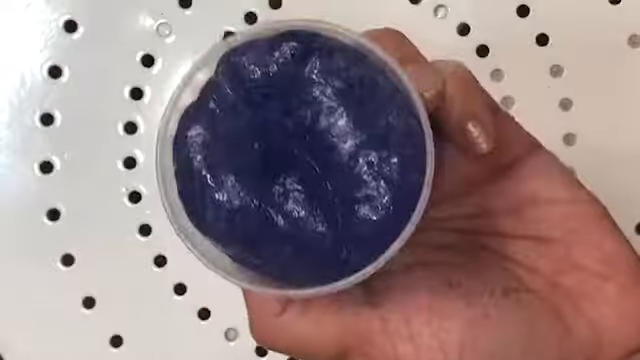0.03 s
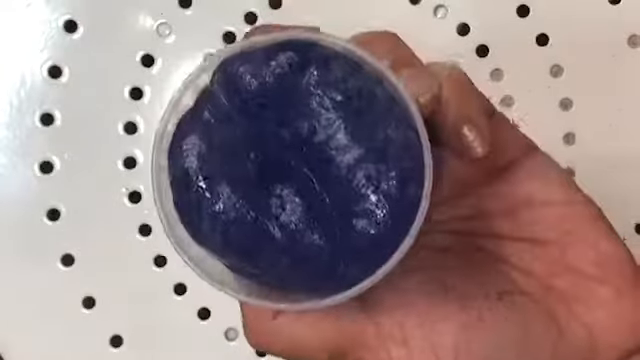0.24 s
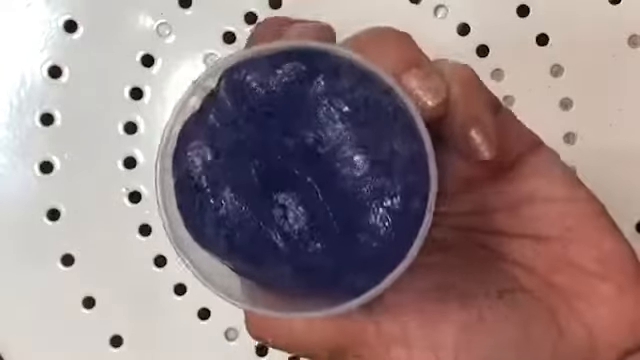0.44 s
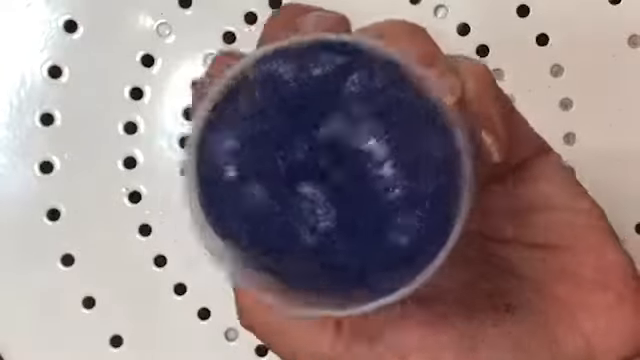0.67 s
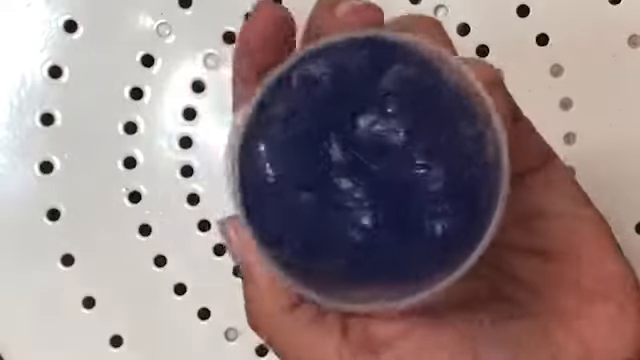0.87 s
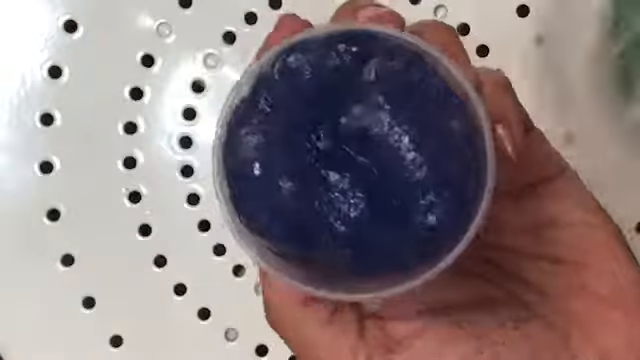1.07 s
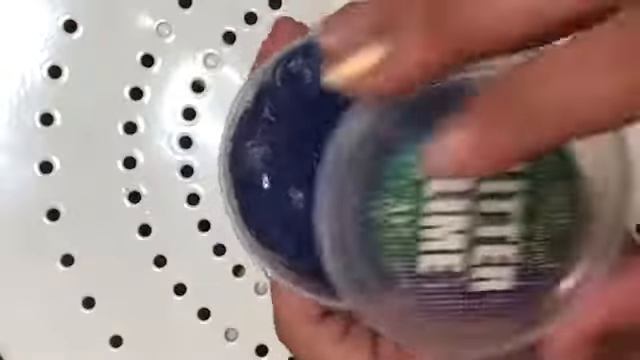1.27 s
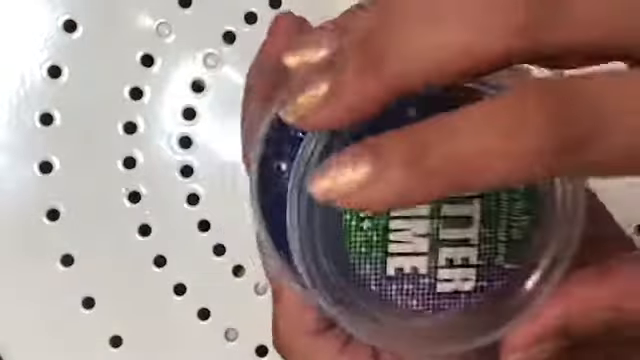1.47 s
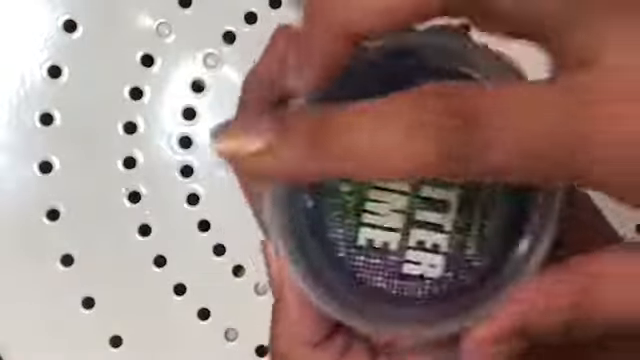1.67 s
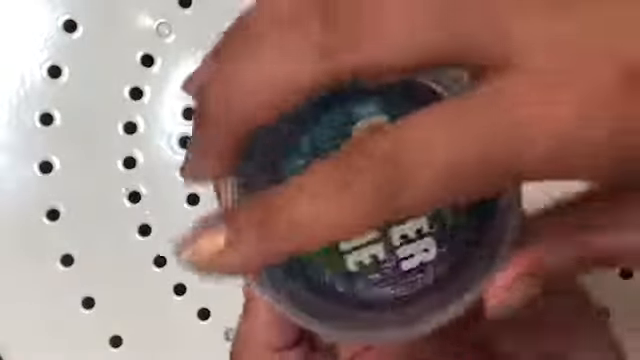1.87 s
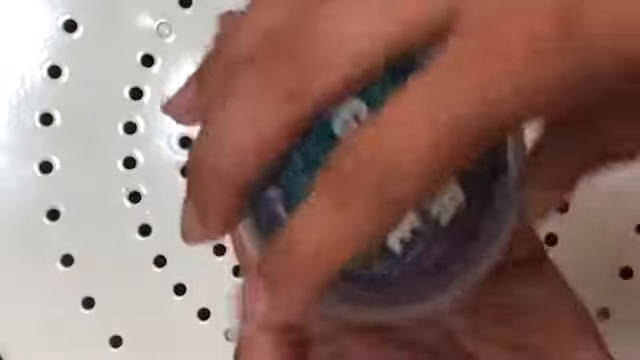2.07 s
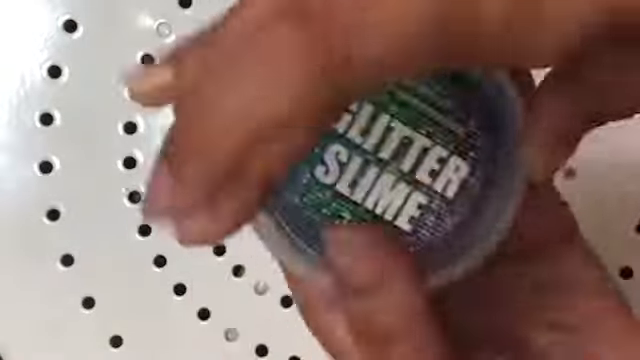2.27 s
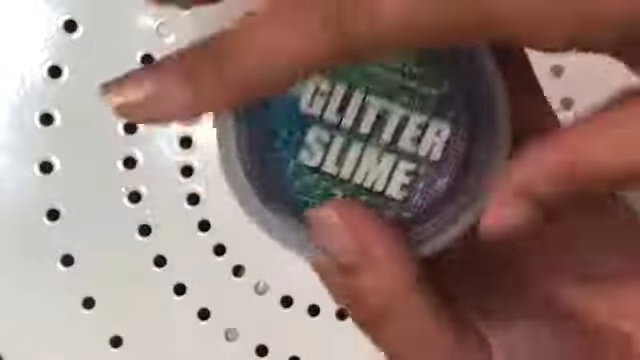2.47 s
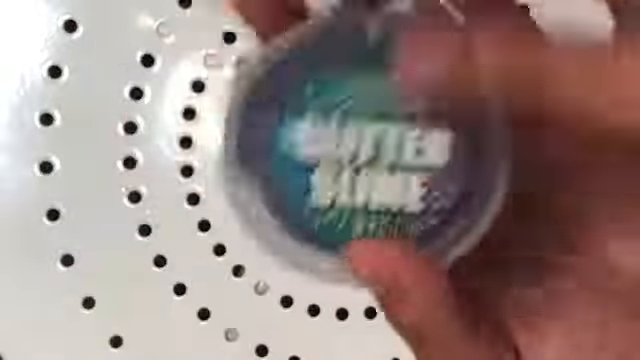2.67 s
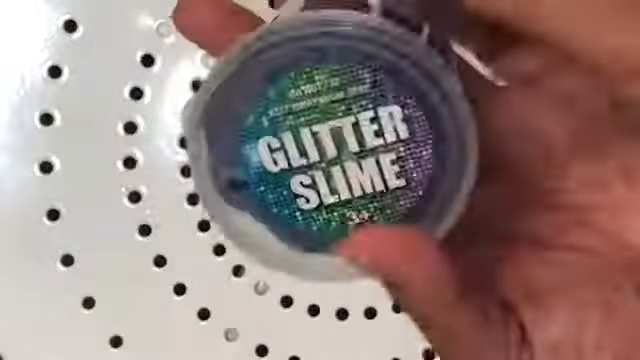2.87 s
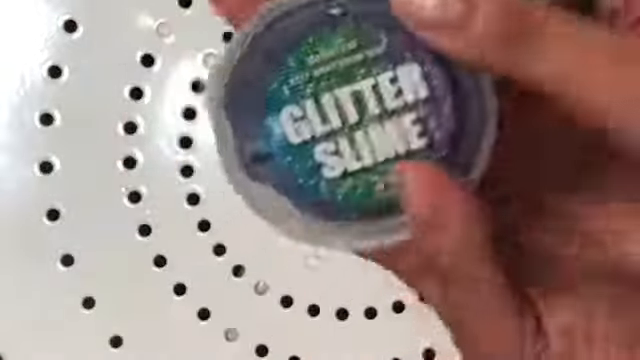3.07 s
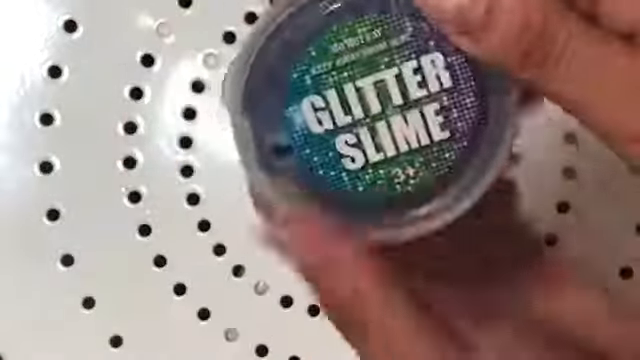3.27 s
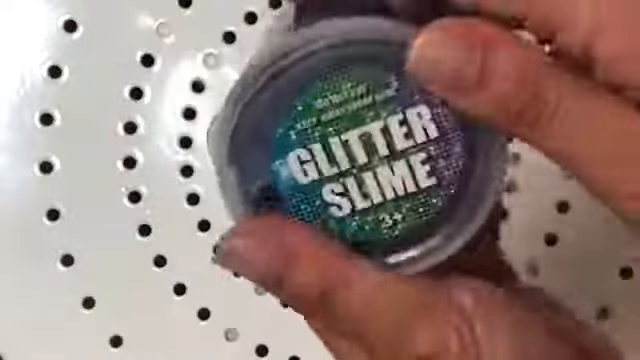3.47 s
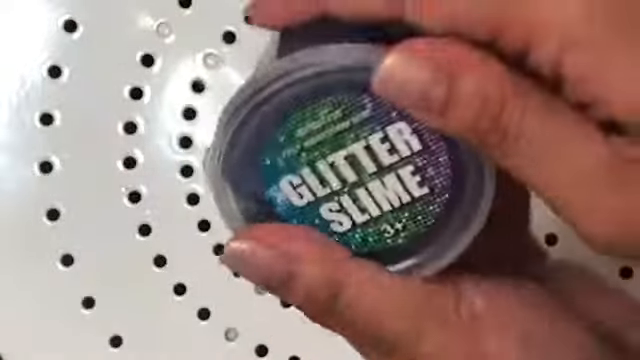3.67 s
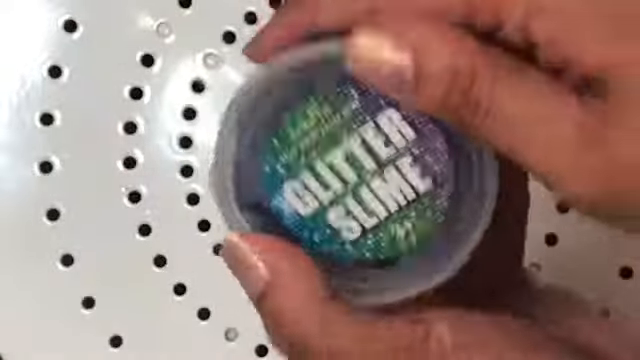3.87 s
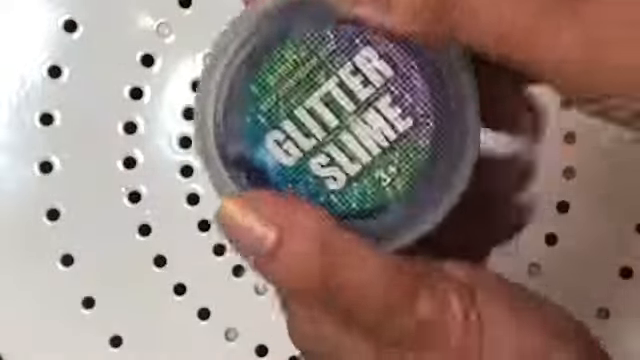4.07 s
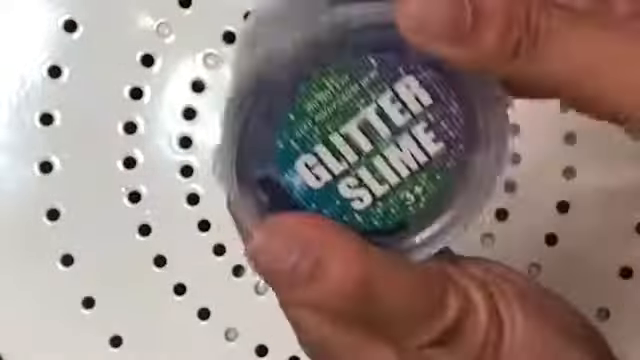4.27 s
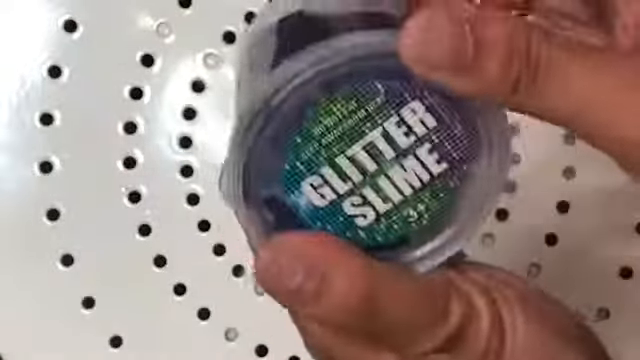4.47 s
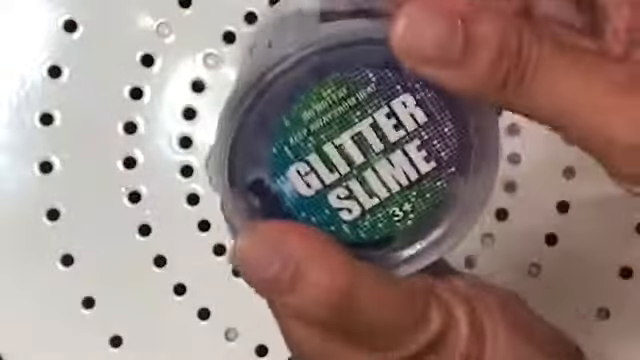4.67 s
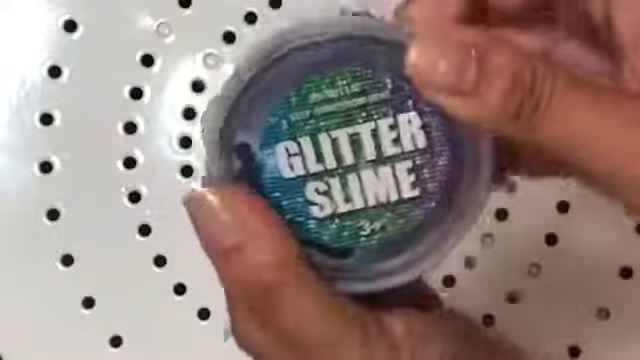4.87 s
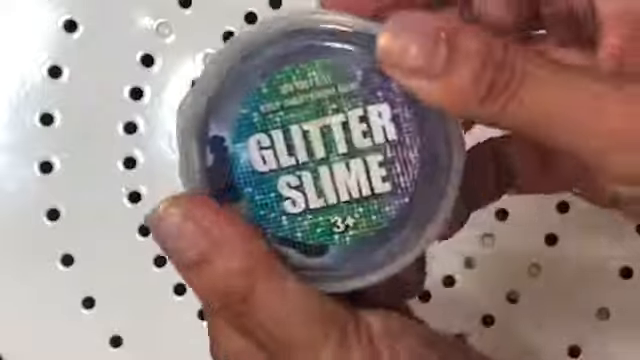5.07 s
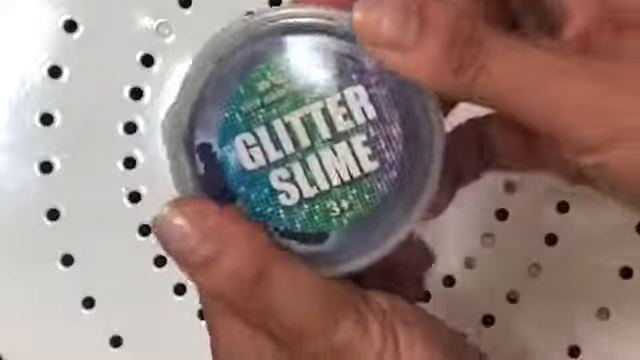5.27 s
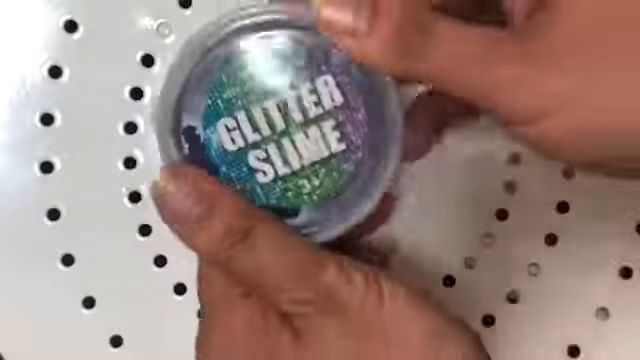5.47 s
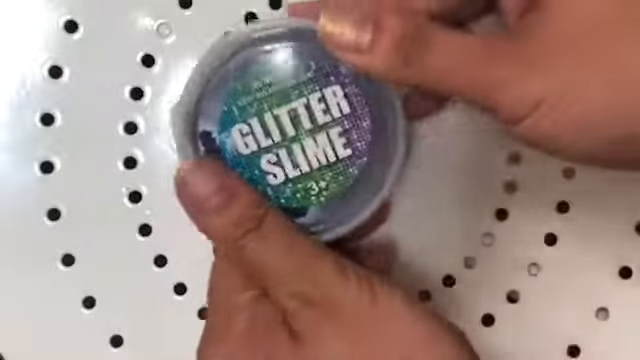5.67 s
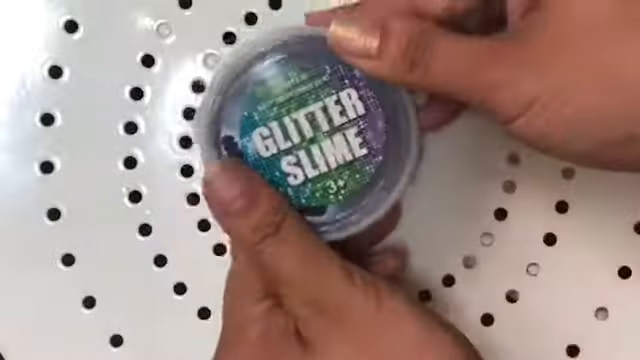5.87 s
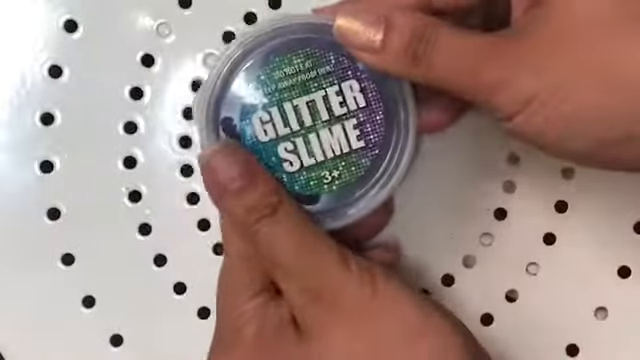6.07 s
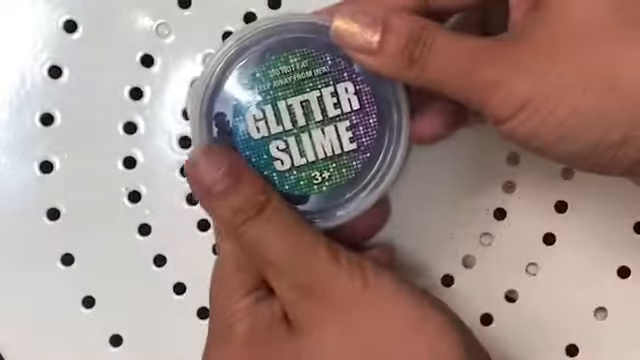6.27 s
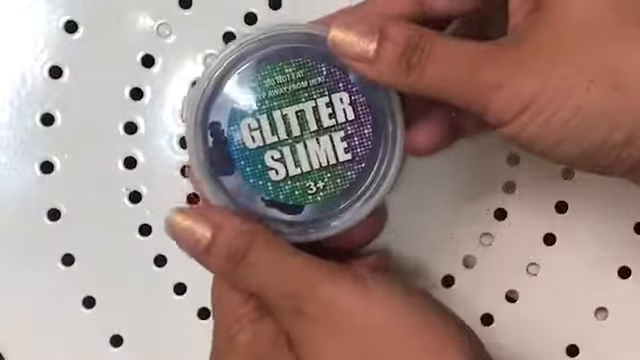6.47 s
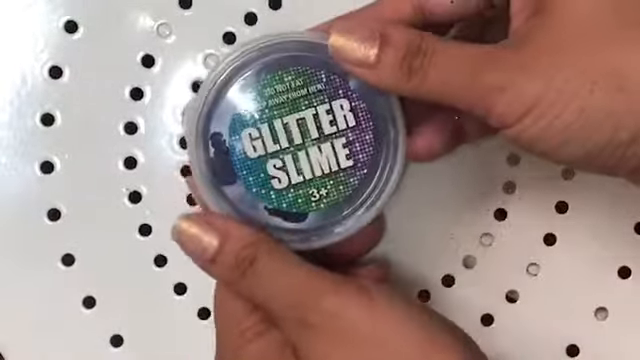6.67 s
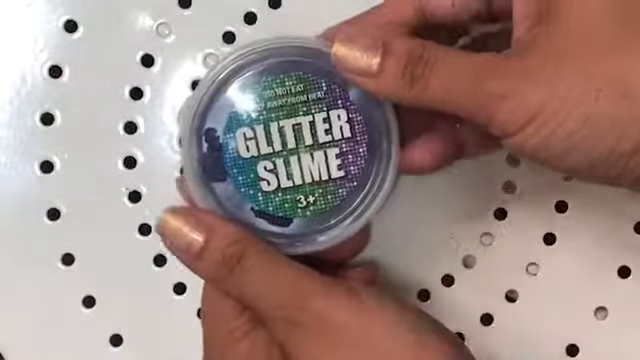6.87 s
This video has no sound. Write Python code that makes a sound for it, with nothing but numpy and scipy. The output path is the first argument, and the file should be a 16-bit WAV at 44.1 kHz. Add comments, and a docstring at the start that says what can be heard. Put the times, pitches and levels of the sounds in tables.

```python
"""A small filled plastic tub clicks as hands press on its thin lid and turn it, close to a phone in a small quiet room.
Each click is decaying modes of belly, wall and rim plus a noise crack in the treble and a crackling tail.
Skin and lid rub: uneven noise slips drive the rim and wall modes and hiss; narrow noise squeaks swell briefly.
One duller knock from further off rings longer modes; steady coloured noise is the still air and microphone hiss."""
import sys
import numpy as np
from scipy import signal
from scipy.fft import rfft, irfft
from scipy.io import wavfile
from scipy.ndimage import uniform_filter1d

SR = 44100
rng = np.random.default_rng(int(sys.argv[2]) if len(sys.argv) > 2 else 0)


def to_wav(s):
    """Save 16-bit WAV."""
    ch = np.atleast_2d(s).T  # columns
    pcm = np.round(np.clip(ch, -1, 1) * 32767)  # PCM
    wavfile.write(sys.argv[1], SR, pcm.astype(np.int16))


N = 305601

# tub wall modes: pitch_hz, level_db, t60_s
WALL_MODES = [(650, -11, 0.029), (734, -8.5, 0.028), (932, -8.5, 0.014), (1136, -8.5, 0.019),
              (1440, -10, 0.021), (1547, -4, 0.009)]
# tub rim modes: pitch_hz, level_db, t60_s
RIM_MODES = [(1787, -13, 0.019), (2249, -8.5, 0.022), (2734, -10.5, 0.032), (3532, -6.5, 0.0075),
             (4300, -9, 0.0086)]
ONSET_S = .0003  # time constant of a mode's attack


def undb(db):
    """Amplitude from dB."""
    return 10 ** (np.asarray(db) / 20)


def unit(x):
    """Scale to rms 1."""
    return x / np.sqrt(np.mean(x ** 2))


def peak_one(x):
    """Scale to peak 1."""
    return x / np.abs(x).max()


def band(x, lo_hz, hi_hz):
    """Butterworth band-pass."""
    return signal.sosfilt(signal.butter(2, [lo_hz, hi_hz], "band", fs=SR, output="sos"), x)


def fade(t, t60_s):
    """Exponential decay, 60 dB down at t60_s."""
    return np.exp(-np.log(1000) * t / t60_s)


def add(out, at_s, x):
    """Mix a short sound in at a time."""
    i = int(at_s * SR)
    out[i:i + len(x)] += x[:N - i]


def tone(hz, t60_s, t):
    """The mode that the grip leaves free to lead: one decaying sine."""
    return fade(t, t60_s) * np.sin(2 * np.pi * hz * t) * (1 - np.exp(-t / ONSET_S))


def ring(modes, t, scatter_db=3.0, detune=.04):
    """One blow into a set of modes, peak 1; pitch and share shift a little each time."""
    hz, db, t60_s = np.transpose(modes)[:, :, None]
    share, bend = rng.standard_normal((2, len(modes), 1))
    sign = rng.choice([-1, 1], (len(modes), 1))
    level = sign * undb(db + scatter_db * share)
    x = level * fade(t, t60_s) * np.sin(2 * np.pi * hz * (1 + detune * bend) * t)
    return peak_one(x.sum(axis=0) * (1 - np.exp(-t / ONSET_S)))


def resonate(x, modes, damp):
    """Drive modes continuously, rms 1; touching fingers shorten the rings by the factor damp."""
    t = np.arange(2048) / SR
    body = sum(undb(db) * fade(t, t60_s * damp) * np.sin(2 * np.pi * hz * t) for hz, db, t60_s in modes)
    return unit(signal.fftconvolve(x, body)[:N])


def air():
    """Still air and microphone hiss: white noise shaped by a fixed spectrum."""
    # spectrum: frequency_hz, relative_density_db
    spectrum = [(12, -43.5), (32, -16), (55, -4), (77, 0), (107, -7), (134, -2), (198, -4.5), (422, -9.5),
                (527, -17), (607, -15.5), (1000, -18.5), (1190, -17.5), (2020, -20.5), (12100, -31),
                (16000, -30.5)]
    rms_db = -65
    hz, db = np.transpose(spectrum)
    f = np.arange(N // 2 + 1) * SR / N + 1  # 1 Hz up keeps log finite
    gain = undb(np.interp(np.log(f), np.log(hz), db))
    return undb(rms_db) * unit(irfft(rfft(rng.standard_normal(N)) * gain, N))


def room(x):
    """Dense reflections of a small furnished room; the treble dies first."""
    t60_s, treble_t60_s, gap_s, level_db = 0.22, .14, 0.0027, -18.5
    t = np.arange(SR // 3) / SR
    low = band(rng.standard_normal(len(t)), 100, 3000)
    high = band(rng.standard_normal(len(t)), 3500, 16000)
    tail = (low * fade(t, t60_s) + 0.31 * high * fade(t, treble_t60_s)) * (t > gap_s)
    return undb(level_db) * signal.fftconvolve(x, tail / np.sqrt(np.sum(tail ** 2)))[:N]


def knock():
    """A hollow object is knocked further off: long-ringing modes and a rattling noise thud, dull on top."""
    # blows: start_s, level_db
    blows = [(5.8461, -25)]
    # object modes: pitch_hz, level_db, t60_s
    modes = [(348.4, -6, 0.38), (373, -8, 0.33), (638, -13.5, 0.31), (843, -18, 0.52), (1007, 2, 0.091),
             (1170, 3, 0.16), (1502, 2.5, .12), (1752, -3.5, 0.16), (1980, 2.5, 0.067), (2154, 6, 0.038),
             (2290, -8, 0.087), (2630, -3, 0.046), (3130, -11, 0.073)]
    thud_db, thud_t60_s = -15.5, 0.26
    out, t = np.zeros(N), np.arange(SR // 2) / SR
    for start_s, level_db in blows:
        impulse_size = undb(2.3 * rng.standard_exponential(len(t)))
        rattle = rng.standard_normal(len(t)) * impulse_size * (rng.random(len(t)) < .1)
        thud = unit(band(band(rattle, 580, 2200), 400, 3300)) * fade(t, thud_t60_s)
        add(out, start_s, undb(level_db) * (ring(modes, t, 1.5, 0.0018) + undb(thud_db) * thud))
    return out


def squeaks():
    """A slipping finger squeaks: narrow, rough noise whistles that swell and fade."""
    # squeaks: centre_s, half_amplitude_length_s, pitch_hz, level_db (rms ahead of the swell)
    table = [(.648, .015, 2300, -64), (1.5, .045, 2300, -63), (2.615, .03, 2600, -67),
             (3.282, .03, 6300, -60), (5.353, .015, 2800, -63)]
    out = np.zeros(N)
    for centre_s, length_s, hz, level_db in table:
        size = int(length_s * 2 * SR)
        whistle = unit(band(rng.standard_normal(size), .95 * hz, 1.05 * hz))
        add(out, centre_s - length_s, undb(level_db) * whistle * np.hanning(size))
    return out


def rubs():
    """Dense uneven slips of skin and lid shake the rim and wall and hiss in the treble."""
    # rubs: full_pressure_s, rise_s (20 dB), hold_s, fall_s (20 dB),
    # level_db, treble_db (re level), wall_db (re level)
    table = [(.655, .02, .01, .1, -67, -8, -15), (.77, .12, .02, .06, -68, 6, -10),
             (.93, .15, .18, .3, -71, 3, -7), (1.377, .015, .01, .06, -53, -3, -5),
             (1.5, .08, .03, .02, -69, -3, -8), (1.555, .03, .01, .025, -49, -14, -4),
             (1.61, .04, .005, .025, -62, -20, 3), (1.742, .008, .03, .2, -56, -9, -15),
             (1.83, .1, .045, .06, -55, -7, -18), (1.97, .1, .04, .05, -66, -14, -6),
             (2.235, .1, .003, .02, -65, -10, -12), (2.358, .014, .008, .02, -27, -4, 1),
             (2.622, .05, .003, .03, -63, -6, -12), (3.032, .01, .002, .025, -46, -6, -6),
             (3.274, .02, .01, .04, -56, -1, -3), (3.954, .05, .005, .05, -70, 6, -12),
             (4.05, .1, .25, .1, -78, -8, 4), (5.32, .02, .15, .05, -77, 2, -5),
             (5.494, .04, .003, .04, -72, -15, 10), (6.507, .02, .003, .04, -64, -10, 12)]
    rim_ring, damp = .7, .4
    lo_hz, mid_hz, hi_hz = 1150, 3900, 14000
    t = np.arange(N) / SR
    slip_size = undb(3.1 * rng.standard_exponential(N)) * (rng.random(N) < .03)
    roughness = uniform_filter1d(slip_size + .3, 40)
    slips, skin = rng.standard_normal((2, N)) * roughness
    rim = unit(rim_ring * resonate(slips, RIM_MODES, damp) + unit(band(slips, lo_hz, mid_hz)))
    wall = resonate(slips, WALL_MODES, damp)
    hiss = unit(band(skin, mid_hz, hi_hz))
    out = np.zeros(N)
    for full_s, rise_s, hold_s, fall_s, level_db, treble_db, wall_db in table:
        before, after = np.maximum(full_s - t, 0), np.maximum(t - full_s - hold_s, 0)
        pressure_db = -20 * (before / rise_s + after / fall_s)
        out += undb(level_db + pressure_db) * (rim + undb(treble_db) * hiss + undb(wall_db) * wall)
    return out


def clicks():
    """The lid lip snaps over the rim: belly, wall, rim and treble crack answer, each with its own share."""
    # clicks: start_s, wall_db, rim_db, crack_db, wall_pitch_hz, rim_pitch_hz
    table = [(0.642, -62, -49, -60, 980, 2560), (0.7836, -75, -54, -46.5, 1210, 3680),
             (1.3555, -36, -32.5, -50, 720, 2720), (1.372, -57, -37.5, -55, 680, 2070),
             (1.3806, -50, -26.5, -28, 930, 2600), (1.3838, -56, -28.5, -30, 785, 2420),
             (1.3934, -37, -28.5, -46, 824, 2350), (1.4039, -47.5, -36, -51, 730, 2420),
             (1.535, -55, -29, -34, 1410, 2510), (1.539, -65, -27, -56, 760, 3800),
             (1.5515, -33.5, -24, -32, 780, 2000), (1.5629, -41, -36, -44, 750, 1860),
             (1.733, -56, -45, -46, 700, 3870), (1.7359, -53, -35, -35, 1450, 3700),
             (1.759, -51, -40, -57, 1350, 2790), (1.98, -47, -44, -55.5, 1170, 1880),
             (2.0025, -54, -51, -59.5, 1340, 1960), (2.2358, -61, -51, -60, 1090, 2410),
             (2.2861, -39.5, -25.5, -18, 1210, 2220), (2.3457, -28, -25, -23, 1400, 1880),
             (2.3543, -30.5, -33, -9.5, 1260, 2120), (2.3615, -18.5, -12.5, -24.5, 1060, 2280),
             (2.3658, -13.5, -22, -12.5, 1146, 2340), (2.6288, -64, -61, -52, 1110, 2650),
             (2.8001, -62, -55.5, -47.5, 670, 3830), (2.9514, -60.5, -54.5, -62, 815, 3270),
             (3.02, -65, -71, -50.5, 1170, 2330), (3.0325, -30, -29, -31.5, 1236, 2730),
             (3.1265, -74.5, -77, -55, 1300, 1940), (3.1953, -51.5, -44.5, -58.5, 850, 2680),
             (3.2006, -44.5, -40, -55.5, 1090, 2700), (3.2317, -36.5, -36, -52.5, 1286, 2260),
             (3.304, -77, -47, -50, 860, 2780), (3.344, -48.5, -48, -51, 1220, 2500),
             (3.353, -54, -45, -65, 1130, 2150), (3.3642, -38.5, -41, -57, 1160, 2500),
             (3.371, -37.5, -42, -75, 1185, 1750), (3.3905, -55, -58, -56, 1100, 2010),
             (3.4156, -45, -47, -64, 990, 2570), (3.4246, -44, -53, -53.5, 1160, 2680),
             (3.4375, -49, -48, -48, 1200, 2090), (3.4475, -40.5, -39, -48, 1350, 1970),
             (3.4512, -37, -39, -48.5, 1200, 2700), (3.54, -52, -49, -73.5, 1140, 2200),
             (3.5678, -40, -40.5, -54, 1150, 2000), (3.5735, -37, -53, -66, 1100, 1820),
             (3.6098, -54, -51, -66, 1150, 2230), (3.616, -46, -61, -77, 1090, 1890),
             (3.6451, -46, -52, -65, 1040, 2540), (3.6525, -40, -51, -56.5, 1080, 2430),
             (3.7091, -49, -74, -88, 1000, 3370), (3.8209, -56, -80, -64.5, 956, 3230),
             (3.8469, -39, -39.5, -53, 1083, 1830), (4.2877, -65, -56.5, -56, 920, 1820),
             (5.3036, -55, -50, -42, 974, 2765), (5.396, -76.5, -76.5, -55, 840, 2160),
             (5.488, -50.5, -49, -57.5, 1470, 1756), (5.752, -74.5, -59.5, -49, 920, 2230),
             (5.8036, -76, -67.5, -51.5, 664, 2390), (5.9207, -45, -54, -78, 1060, 1735),
             (6.4244, -25, -26, -27, 1030, 2710), (6.4409, -29, -37, -49.5, 1050, 2300),
             (6.4715, -41, -45, -61, 1020, 2300), (6.5052, -37, -42, -54, 1120, 1700)]
    # belly modes: pitch_hz, level_db, t60_s
    belly_modes = [(200, -12, 0.027), (280, -7, 0.04), (352, -1, 0.037), (382, -10, 0.0067)]
    # treble modes of the crack: pitch_hz, level_db, t60_s
    sheen_modes = [(6700, -3, .006), (8500, -6, .005), (11500, -5, .005)]
    wall_t60_s, rim_t60_s, crack_t60_s = .019, .009, .007
    settle_t60_s, settle_db = 0.16, -24
    crack_lo_hz, crack_top_hz, crack_hz_per_db = 3300, 11500, 400
    out, t = np.zeros(N), np.arange(8192) / SR
    for start_s, wall_db, rim_db, crack_db, wall_hz, rim_hz in table:
        # a soft fingertip gives little crack, loads the wall slowly and wakes few rim modes
        soft = np.clip((wall_db - crack_db) / 20, .02, 1)
        load_s = .0012 * soft
        # the belly grows slowly with the blow; light hard ticks barely move it
        mean_blow_db = (wall_db + rim_db) / 2
        hardness_db = max(crack_db - wall_db, 0)
        belly_db = min(-45 + .55 * (mean_blow_db + 38), wall_db + 4 - .5 * hardness_db)
        belly = ring(belly_modes, t)
        wall = peak_one(tone(wall_hz, wall_t60_s, t) + .4 * ring(WALL_MODES, t))
        rim = peak_one(tone(rim_hz, rim_t60_s, t) + (.8 - 1.2 * soft) * ring(RIM_MODES, t))
        # the crack reaches higher the more it stands above the rim
        top_hz = np.clip(crack_top_hz + crack_hz_per_db * (crack_db - rim_db), 8500, 15500)
        burst = rng.standard_normal(len(t)) * fade(t, crack_t60_s)
        hiss = peak_one(band(burst, crack_lo_hz, top_hz))
        crack = peak_one(hiss + .25 * ring(sheen_modes, t))
        # the thin plastic crackles on as it settles, in the bands that were struck
        grit = rng.standard_normal(len(t)) * undb(2.5 * rng.standard_exponential(len(t)))
        shares = ((wall_db, .6 * wall_hz, 1.6 * wall_hz),
                  (rim_db, 1700, 4200 - 1200 * soft),
                  (crack_db, 4000, 10000))
        settle = sum(undb(db + settle_db) * unit(band(grit, lo_hz, hi_hz)) for db, lo_hz, hi_hz in shares)
        settle = settle * fade(t, settle_t60_s)
        blow = undb(belly_db) * belly + undb(wall_db) * wall + undb(rim_db) * rim
        add(out, start_s - load_s, (blow + settle) * (1 - np.exp(-t / load_s)))
        add(out, start_s, undb(crack_db) * crack)
    return out


def scene():
    """Tub and knock in the room, over the still air."""
    # small objects radiate hardly any bass
    near = band(clicks() + rubs() + squeaks() + knock(), 200, 19000)
    return (near + room(near) + air())[None]


def record(dry):
    """A short inverted echo in the microphone port combs the spectrum; the phone cuts the top."""
    port_echo_hz, port_echo_db, top_hz = 2600, -18, 15900
    lag = int(round(SR / port_echo_hz))
    combed = dry - undb(port_echo_db) * np.roll(dry, lag, axis=1)
    return signal.sosfilt(signal.ellip(8, .2, 60, top_hz, fs=SR, output="sos"), combed)


dry = scene()
out = record(dry)
to_wav(out)
```